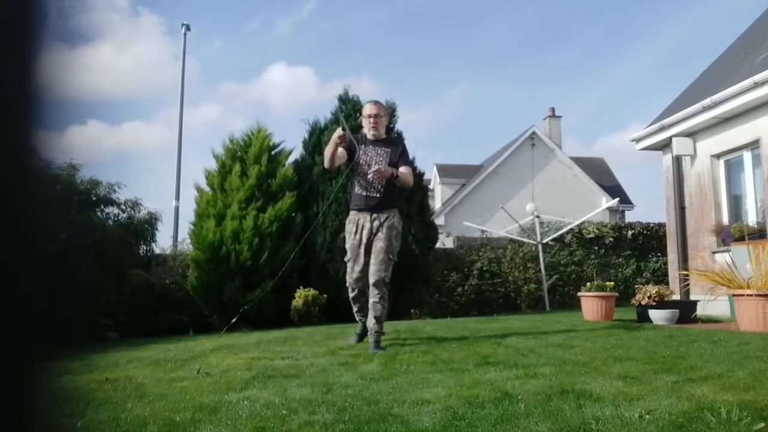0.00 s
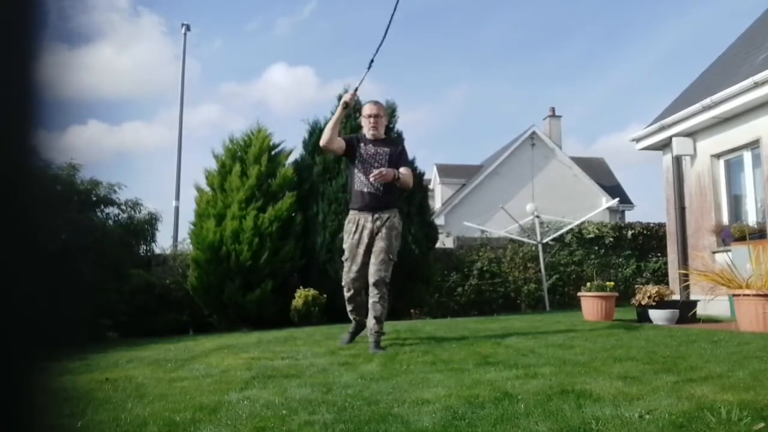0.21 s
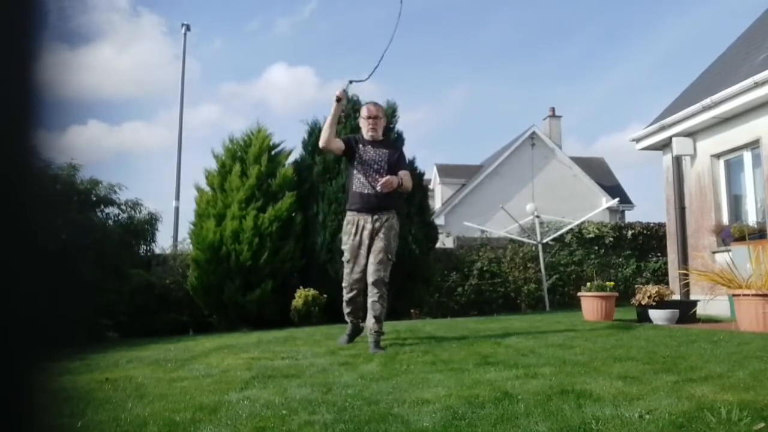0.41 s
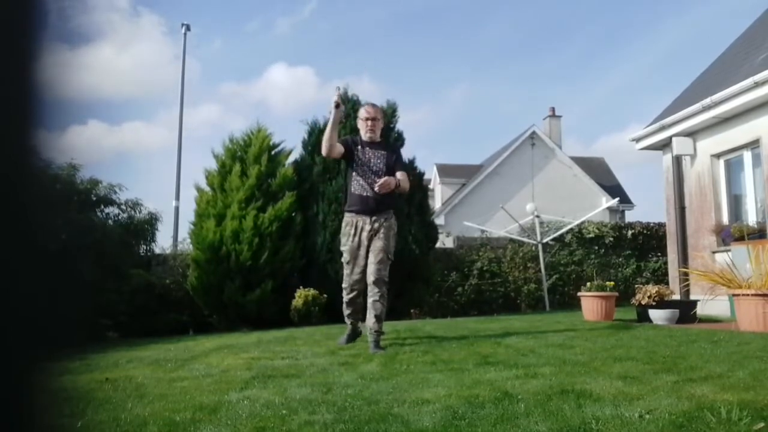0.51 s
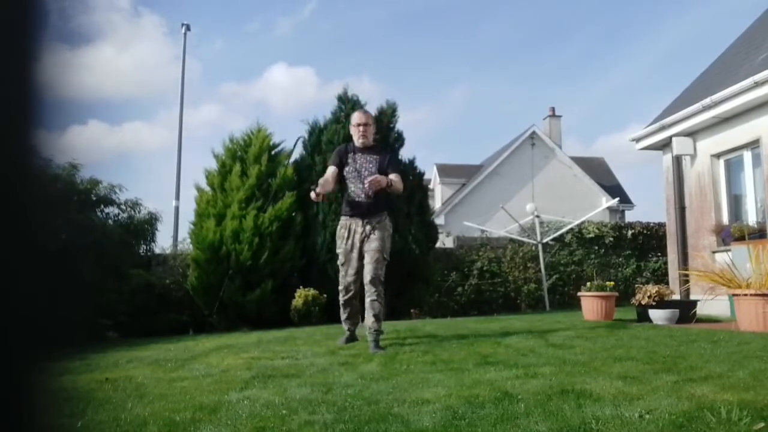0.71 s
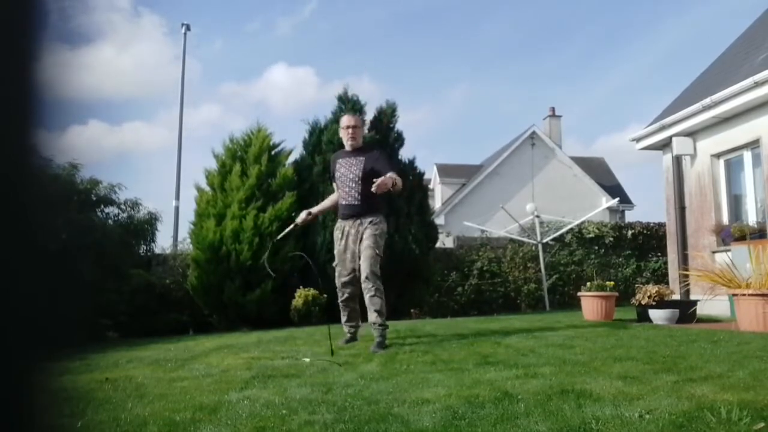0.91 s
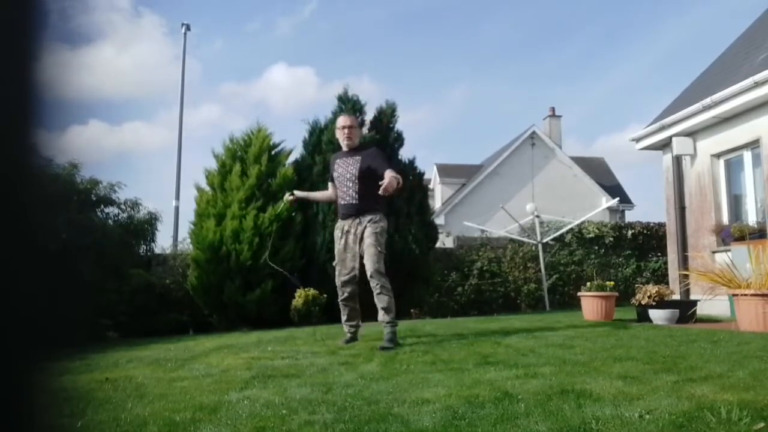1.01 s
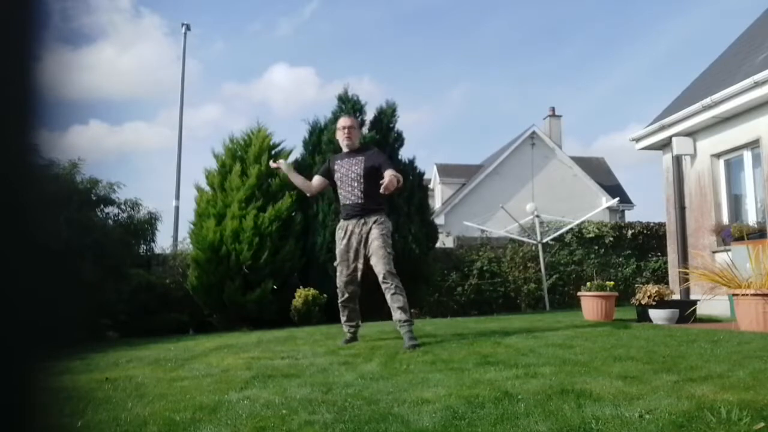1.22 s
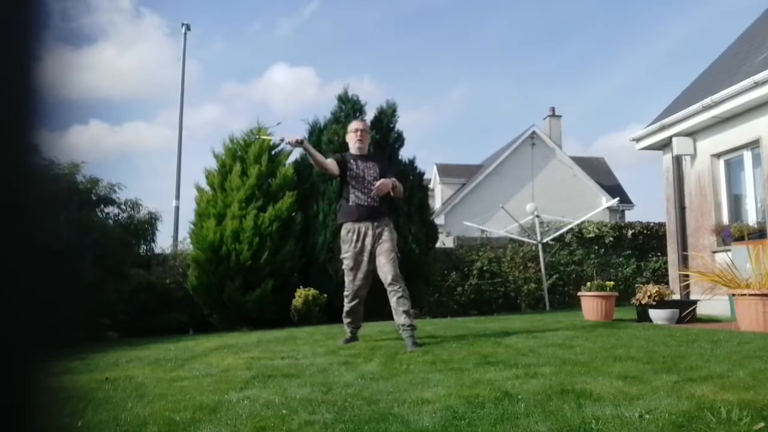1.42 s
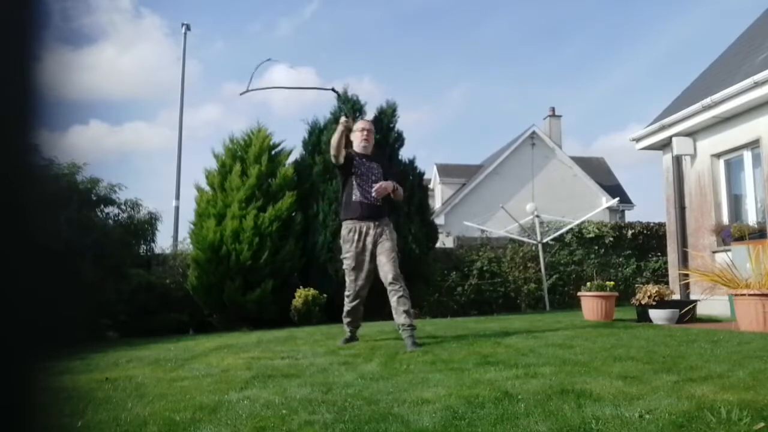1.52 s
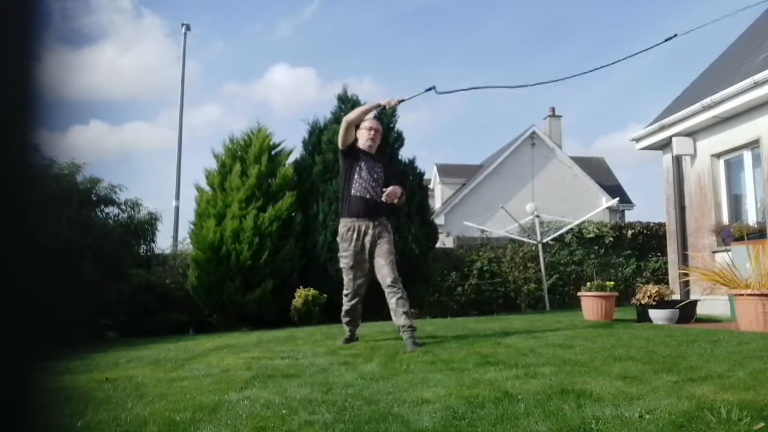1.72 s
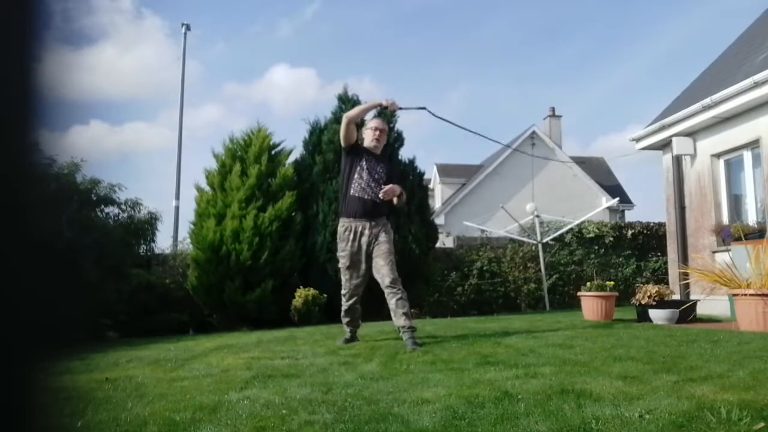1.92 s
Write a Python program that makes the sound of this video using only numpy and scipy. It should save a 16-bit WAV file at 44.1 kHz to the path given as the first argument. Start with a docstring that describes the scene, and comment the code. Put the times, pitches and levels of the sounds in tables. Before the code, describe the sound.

Whip cracks outdoors between houses and hedges, each with quick slap echoes and a brief tail; rough low wind buffeting bursts between the first cracks and the loudest one, then near quiet and a weak scuffing snap.

```python
"""Wall echoes and the tail of a whip crack over faint hiss, then two more cracks, buffeting wind
and a quick scuff of three weak snaps: a long leather whip on a lawn between houses and hedges.
Crack: noise swish, shock and low push pulses, short noise burst, wall echoes, diffuse noise tail.
Garden: coloured noise hiss and short noise bands for faint sounds: rustles, a tick, a chirp.
Wind: random pressure pulses from eddies on the two microphone ports, mostly the right."""
import sys
import numpy as np
from scipy import signal
from scipy.fft import rfft, irfft, next_fast_len
from scipy.io import wavfile
from scipy.ndimage import map_coordinates

SR = 44100
rng = np.random.default_rng(int(sys.argv[2]) if len(sys.argv) > 2 else 0)


def to_wav(s):
    """Save 16-bit WAV."""
    ch = np.atleast_2d(s).T  # columns
    pcm = np.round(np.clip(ch, -1, 1) * 32767)  # PCM
    wavfile.write(sys.argv[1], SR, pcm.astype(np.int16))


N = 88200


def amp(db):
    """Decibels to gain."""
    return 10 ** (np.asarray(db, float) / 20)


def unit(x):
    """Scale to rms 1."""
    return x / np.sqrt(np.mean(x ** 2) + 1e-20)


def along(points, hz):
    """Interpolate (Hz, value) points on a log frequency axis."""
    point_hz, value = np.transpose(points)
    return np.interp(np.log(hz + 1), np.log(point_hz + 1), value)


def filtered(x, response):
    """Multiply the spectrum of x by a real or complex response of frequency."""
    count = x.shape[-1]
    padded = next_fast_len(count + 8192)
    hz = np.fft.rfftfreq(padded, 1 / SR)
    return irfft(rfft(x, padded) * response(hz), padded)[..., :count]


def causal(points, hz):
    """Minimum-phase response through (Hz, dB) points, by folding the cepstrum."""
    cepstrum = irfft(np.log(amp(along(points, hz))))
    half = len(cepstrum) // 2
    cepstrum[1:half] *= 2
    cepstrum[half + 1:] = 0
    return np.exp(rfft(cepstrum))


def sides(left_right_db):
    """Left and right gains for a level difference."""
    return amp([[left_right_db / 2], [-left_right_db / 2]])


def noise(count):
    """White stereo noise."""
    return rng.standard_normal((2, count))


def wobble(knots_per_s, count):
    """Two smooth random curves: splines through Gaussian knots."""
    at_knot = np.arange(count) * knots_per_s / SR
    return np.array([map_coordinates(rng.standard_normal(1000), [at_knot]) for _ in "LR"])


def burst(t, decay_s):
    """Stereo noise of set energy that swells to t = 0 and dies away."""
    shape = np.exp(-np.abs(t) / decay_s)
    return unit(noise(len(t)) * shape) * np.sqrt(np.mean(shape ** 2))


# colour of the swish and of the tail: pitch_hz, level_db
WHIP_COLOUR = [(250, -24.5), (450, -3), (600, 0), (850, -5.5), (1150, 3.5), (1500, -1), (3000, -5.5),
               (8000, -8.5), (15000, -10.5)]


def swish(t, lead_s, rise_s):
    """Air noise of the moving tip: rises around lead_s before the shock, stops at it."""
    air = unit(filtered(noise(len(t)), lambda hz: amp(along(WHIP_COLOUR, hz))))
    return air * (t < 0) / (1 + np.exp(-(t + lead_s) / rise_s))


def pressure_pulse(since_s, width_s):
    """Pressure jump that swings below zero: shock wave if narrow, low push if wide."""
    u = since_s / width_s
    return (1 - 2 * u) * np.exp(-u * u)


# echoes from the walls: delay_s, level_db, left_right_db
WALLS = [(.007, -6, 2), (.013, 2, 0), (.016, 0, -2), (.021, -7, 0), (.029, -4, -5), (.053, -15, 3),
         (.081, -11, 3)]
SMEAR_S, WALL_HZ = .0006, 3500  # a rough wall spreads and dulls its echo
NEAR_DB, NEAR_S = -6.5, 0.0089  # nearby hedges: level, centre and decay of the scatter


def wall_echoes(t, echo_db):
    """Walls return smeared bursts over hedge scatter, all through a one-pole low-pass."""
    echoes = np.zeros((2, len(t)))
    for delay_s, level_db, left_right_db in WALLS:
        echoes += amp(echo_db + level_db) * sides(left_right_db) * burst(t - delay_s, SMEAR_S)
    echoes += amp(echo_db + NEAR_DB) * burst(t - NEAR_S, NEAR_S) * (t > 0)
    return filtered(echoes, lambda hz: WALL_HZ / (WALL_HZ + 1j * hz))


# reverberation time in the garden: pitch_hz, t60_s
GARDEN_T60 = [(500, 0.13), (1500, 0.21), (4000, 0.23), (8000, 0.13), (14000, 0.17)]
ONSET_S = 0.0035
HOLD_S, KNEE_S = 0.044, 0.042  # the tail holds while far walls answer
LATE_DB, LATE_SLOWER = -13, 2.25  # far houses: a weaker, slower tail
GRAIN_DB, GRAIN_PER_S = 2.8, 350  # many small echoes


def tail(tilt_db_per_octave):
    """The garden's diffuse answer: holds, then each frequency dies at its own speed."""
    count = SR // 2
    hz, t, spectrum = signal.stft(noise(count), SR, nperseg=256)
    late_s = KNEE_S * np.logaddexp(0, (t - HOLD_S) / KNEE_S)  # soft start of the decay
    fall = amp(-60 * late_s / along(GARDEN_T60, hz)[:, None])
    fall = fall + amp(LATE_DB) * fall ** (1 / LATE_SLOWER)
    colour = amp(along(WHIP_COLOUR, hz) + tilt_db_per_octave * np.log2(hz / 2000 + 0.11))
    shape = colour[:, None] / np.sqrt(np.mean(colour ** 2)) * fall
    x = signal.istft(spectrum * shape, SR, nperseg=256)[1][:, :count]
    onset = 1 - np.exp(-(np.arange(count) / SR / ONSET_S) ** 2)
    return x * onset * amp(GRAIN_DB * wobble(GRAIN_PER_S, count))


RING_HZ, RING_WIDTH_HZ = 6750, 920


def port_ring(x):
    """Band-pass resonance of the left port, excited by sound from its side."""
    def resonance(hz):
        damping = 1j * hz * RING_WIDTH_HZ
        return damping / (RING_HZ ** 2 - hz * hz + damping)
    return filtered(x, resonance)


# one row per crack or snap: start_s, shock_db, left_right_db, right_later_ms, low_push_db, burst_db,
# burst_decay_ms, swish_db, swish_lead_s, swish_rise_s, wall_echoes_db, tail_db,
# treble_tilt_db_per_octave, left_port_ring_db
CRACKS = [(-.019, -5, -8.5, 0, -37, -30, 1.1, -70, .02, .005, -17.5, -38, 0.5, 0),
          (.192, -15, -5, 0.22, -23.5, -27.5, 2.9, -44, 0.017, 0.017, -34, -45, 0.5, -8.5),
          (0.95, -1.5, -3, -0.05, -30.5, -14.5, .9, -50, .026, 0.0025, -19, -40.5, -1.5, -10),
          (1.789, -39, 2.5, -0.33, -30.5, -27.5, 3, -45.5, 0.026, 0.00326, -31.5, -41, -2.5, 5),
          (1.7949, -42, -5, -0.26, -51.5, -26, 1.6, -61.5, .01, .004, -32.5, -44, -1, 7),
          (1.7965, -28, 0.5, -0.34, -39, -24, 1.9, -65, 0.014, .004, -32.5, -46.5, 0.5, 8)]
SHOCK_S, PUSH_S = .00008, .0006  # pulse widths


def whip():
    """Each crack: swish, shock and push, short noise burst around the shock, wall echoes, tail."""
    lead = SR // 4  # samples kept ahead of the shock
    out = np.zeros((2, N + SR))
    t = (np.arange(SR // 2 + lead) - lead) / SR
    for (start_s, shock_db, left_right_db, right_later_ms, push_db, burst_db, burst_decay_ms,
         swish_db, lead_s, rise_s, echo_db, tail_db, tilt_db, ring_db) in CRACKS:
        at = round(start_s * SR)
        since_s = t - (start_s - at / SR) - np.array([[0], [right_later_ms / 1000]])
        x = amp(swish_db) * swish(t, lead_s, rise_s)
        x += amp(shock_db) * pressure_pulse(since_s, SHOCK_S)
        x += amp(push_db) * pressure_pulse(since_s, PUSH_S)
        x += amp(burst_db) * burst(t, burst_decay_ms / 1000)
        x += wall_echoes(t, echo_db)
        x[:, lead:] += amp(tail_db) * tail(tilt_db)
        x[0] += amp(ring_db) * port_ring(x[0])
        out[:, at + lead:][:, :len(t)] += x * sides(left_right_db)
    return out[:, 2 * lead:][:, :N]


# far background: time_s, level_db
HISS = [(0, -69), (.4, -69.5), (.65, -68), (.9, -66), (1.3, -69.5), (1.6, -65.5), (2, -69.5)]
# its colour: pitch_hz, level_db
HISS_COLOUR = [(150, 8), (500, 10.5), (900, 6), (1800, 0), (4000, -7), (8000, -9), (15000, -3.5)]


def hiss():
    """Far background: coloured noise above 100 Hz with a drifting level."""
    level_db = np.interp(np.arange(N) / SR, *np.transpose(HISS))
    far = filtered(noise(N), lambda hz: amp(along(HISS_COLOUR, hz)) * (hz > 100))
    return amp(level_db) * unit(far)


# rustles, a tick, a chirp: centre_s, length_s, level_db, pitch_hz, width_hz, left_right_db
FAINT_SOUNDS = [(.78, 0.024, -75.5, 4000, 6000, -10.5), (1.264, 0.0015, -60, 9000, 9000, 8.5),
                (1.281, .004, -73, 6800, 3000, 3.5), (1.313, 0.025, -68.5, 9300, 9000, 1),
                (1.43, 0.014, -74, 7040, 3000, 7), (1.458, 0.024, -71, 2800, 610, 9),
                (1.448, 0.036, -71, 780, 122, 9)]


def faint_sounds():
    """Faint garden sounds: Gaussian noise bands under Gaussian envelopes."""
    t = np.arange(N) / SR
    out = np.zeros((2, N))
    for centre_s, length_s, level_db, pitch_hz, width_hz, left_right_db in FAINT_SOUNDS:
        band = unit(filtered(noise(N), lambda hz: np.exp(-((hz - pitch_hz) / width_hz) ** 2)))
        envelope = np.exp(-((t - centre_s) / length_s) ** 2)
        out += amp(level_db) * sides(left_right_db) * band * envelope
    return out


def pulses(start_s, size, half_width_s):
    """Rounded (Lorentzian) pressure pulses, windowed and summed."""
    k = np.arange(-600, 600)
    at = np.round(start_s * SR).astype(int)[:, None] + k + 600
    shape = size[:, None] / (1 + (k / SR / half_width_s[:, None]) ** 2) * np.hanning(len(k))
    return np.bincount(at.ravel(), shape.ravel(), N + 1200)[600:N + 600]


EDDIES_PER_S, PUSH_SHARE, SCATTER_DB = 330, .55, 3
NARROWS_DB_PER_DB, WIDTH_SCATTER = .22, .2


def eddies(strength, width_ms, gain_db):
    """Random eddies pass a port; stronger wind makes them bigger and narrower."""
    gap, sign = rng.random((2, 1500))
    wide, big = rng.standard_normal((2, 1500))
    start_s = np.cumsum(.5 + gap) / EDDIES_PER_S
    keep = start_s < N / SR
    wind_db = np.interp(start_s, *np.transpose(strength))
    width_s = width_ms / 1000 * amp(-NARROWS_DB_PER_DB * (wind_db + 35))  # width_ms holds at -35 dB
    width_s = width_s * np.exp(WIDTH_SCATTER * np.tanh(wide))
    push_or_pull = np.where(sign < PUSH_SHARE, 1, -1)
    size = push_or_pull * amp(wind_db + gain_db + SCATTER_DB * big) / np.sqrt(EDDIES_PER_S * width_s)
    return pulses(start_s[keep], size[keep], width_s[keep])


# single wind buffets, right port: start_s, level_db, half_width_ms (negative: a pull)
BUFFETS = [(.112, -17.5, -2), (0.224, -15.5, 0.6), (0.304, -15, 1.2), (.356, -12.5, 1.9), (0.369, -14, .7),
           (0.395, -7.5, 0.9), (.41, -9.5, .7), (0.412, -14.5, -4), (0.459, -11.5, -0.4), (0.464, -6, -1.3),
           (0.4643, -9, -1), (0.465, -10.5, 0.3), (0.481, -5.5, 0.26), (0.483, -12, -1.5), (0.491, -9, 0.5),
           (.501, -9, 1.3), (0.5104, -9.5, -0.06), (0.5113, -18.5, 2.3), (0.521, -4.5, -1.3),
           (0.5294, -6, 1.4), (0.5398, -20.5, -0.6), (0.5465, -8, -0.3), (0.5668, -3, 0.53),
           (0.595, -16.5, -1.8), (0.617, -10, -0.87), (0.634, -28.5, 3.5), (.66, -23.5, 2.7),
           (0.6819, -12, .8), (0.7241, -8, 1.3), (0.729, -16.5, -1.5), (0.751, -16, 1.4), (.761, -2, 1.35),
           (0.7677, -10.5, 0.6), (.774, -8, -0.88), (0.807, -6, 1.24), (.8784, -8, 0.87), (1.102, -28, 0.8),
           (1.22, -26.5, 0.4), (1.335, -16, .9), (1.344, -25.5, -0.4), (1.3519, -14.5, 0.83),
           (1.428, -23, 1.7), (1.439, -19.5, 0.7), (1.56, -25.5, 1.3), (1.649, -12.5, 1.56)]
NARROWEST_MS = .52  # floor on the half width


def buffets():
    """Single wind buffets, pushes and pulls, weak to strong, narrow to wide."""
    start_s, level_db, width_ms = np.transpose(BUFFETS)
    width_s = np.maximum(abs(width_ms), NARROWEST_MS) / 1000
    return pulses(start_s, np.sign(width_ms) * amp(level_db), width_s)


# wind strength at each port, before its gain: time_s, strength_db
WIND_LEFT = [(0.0, -56.5), (0.09, -52), (0.15, -43), (0.4, -56), (0.6, -41), (0.7, -41), (0.77, -51),
             (0.8, -47), (0.85, -54), (0.89, -58), (1.05, -59), (1.11, -37.5), (1.14, -55.5), (1.25, -40.5),
             (1.3, -57), (1.36, -52), (1.44, -48.5), (1.53, -49), (1.56, -50), (1.65, -54), (1.7, -46.5),
             (1.83, -58), (1.9, -46), (1.92, -53), (1.95, -33), (1.99, -39)]
WIND_RIGHT = [(0.0, -41.5), (0.09, -48), (0.11, -35), (0.18, -42), (0.23, -27.5), (0.38, -23),
              (0.41, -17.5), (0.44, -23), (0.53, -13.5), (0.59, -29), (0.77, -24), (0.79, -28),
              (0.81, -31.5), (0.86, -28), (0.88, -33), (1.05, -37), (1.09, -30), (1.14, -50.5), (1.22, -33),
              (1.26, -43.5), (1.34, -28.5), (1.38, -39.5), (1.44, -31), (1.47, -45), (1.51, -27),
              (1.54, -45), (1.56, -32.5), (1.6, -41), (1.65, -35.5), (1.67, -39.5), (1.72, -41),
              (1.75, -50), (1.79, -47), (1.86, -51), (1.88, -41.5), (1.91, -52), (1.96, -43.5), (1.99, -69)]
CLUMP_DB, CLUMPS_PER_S = 2.5, 45  # eddies come in flaps with gaps between
PORT_LOW_HZ = 52


def wind():
    """Buffeting, unrelated from port to port, through a two-pole high-pass."""
    left = eddies(WIND_LEFT, width_ms=1.62, gain_db=5.5)
    right = eddies(WIND_RIGHT, width_ms=1.228, gain_db=-1.5)
    x = np.array([left, right]) * amp(CLUMP_DB * wobble(CLUMPS_PER_S, N))
    x[1] += buffets()
    return filtered(x, lambda hz: (1j * hz / (PORT_LOW_HZ + 1j * hz)) ** 2)


# port resonances: pitch_hz, level_db
LEFT_PORT = [(100, -12), (500, -3), (1500, -4), (3100, -1), (4000, -8.5), (5200, 0), (5900, 0), (6700, 5.5),
             (7500, 2.5), (8500, -11), (11000, -7.5), (15000, -17)]
RIGHT_PORT = [(100, -7.5), (500, -6), (1500, -3.5), (3100, -2), (4000, -10.5), (5200, 0), (5900, -1),
              (6700, -2.5), (7500, -1.5), (8700, 3), (11000, -10), (15000, -20)]


def through_ports(air):
    """Each port's resonances colour the airborne sound, minimum phase."""
    return filtered(air, lambda hz: np.array([causal(LEFT_PORT, hz), causal(RIGHT_PORT, hz)]))


def scene():
    """Airborne sound enters through the ports; wind acts on the capsules directly."""
    return through_ports(whip() + hiss() + faint_sounds()) + wind()


TOP_HZ = 16000


def record(dry):
    """The camera keeps nothing above its band limit."""
    return filtered(dry, lambda hz: hz < TOP_HZ)


dry = scene()
out = record(dry)
to_wav(out)
```